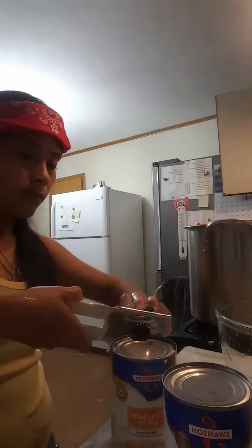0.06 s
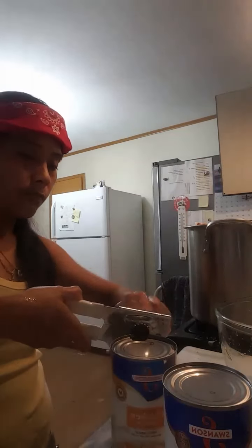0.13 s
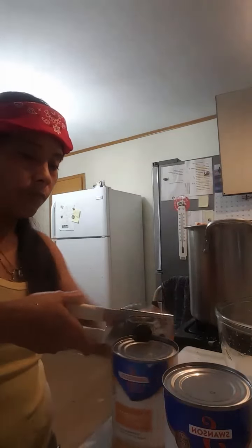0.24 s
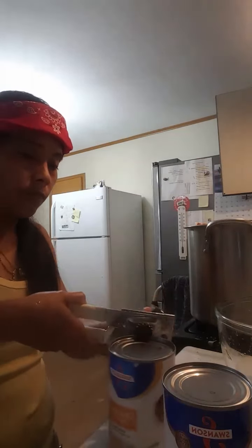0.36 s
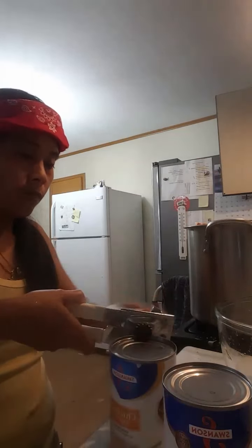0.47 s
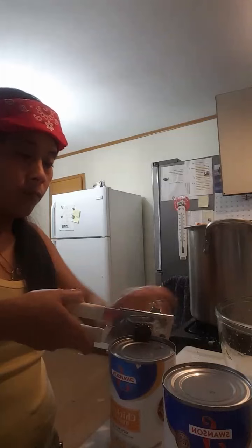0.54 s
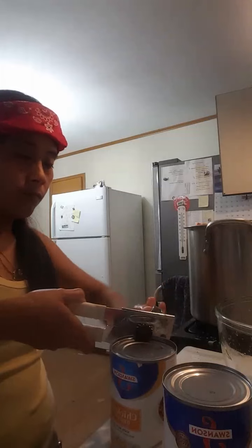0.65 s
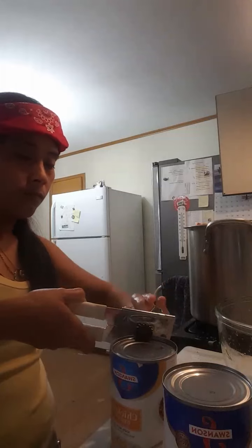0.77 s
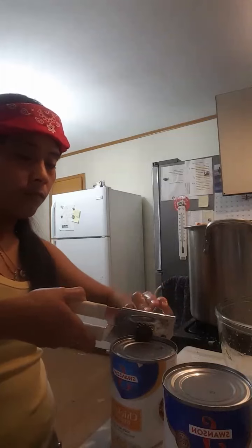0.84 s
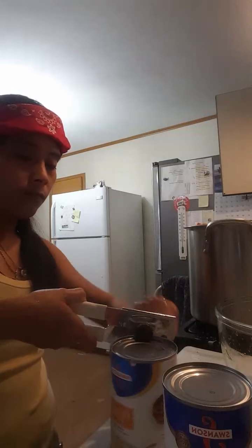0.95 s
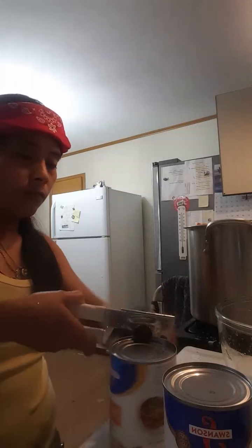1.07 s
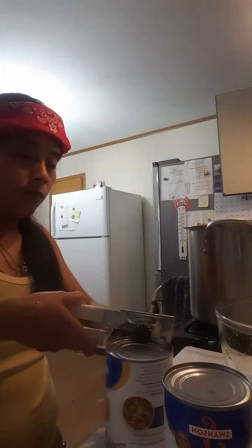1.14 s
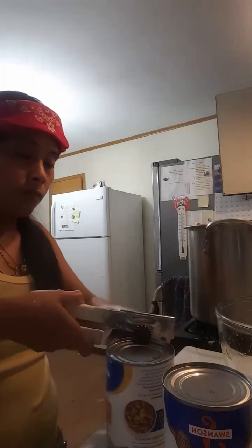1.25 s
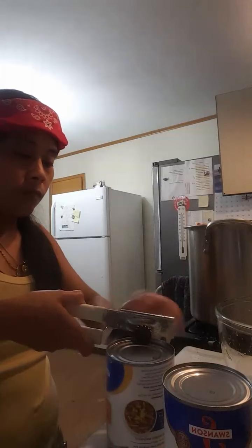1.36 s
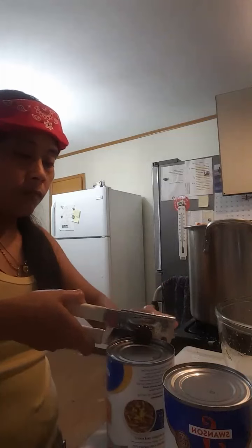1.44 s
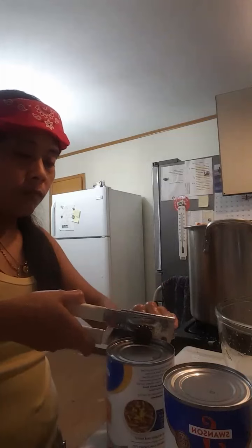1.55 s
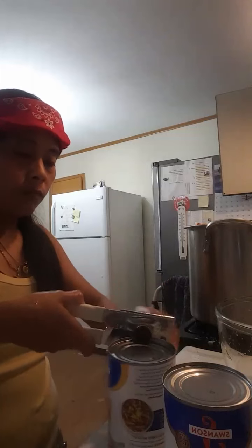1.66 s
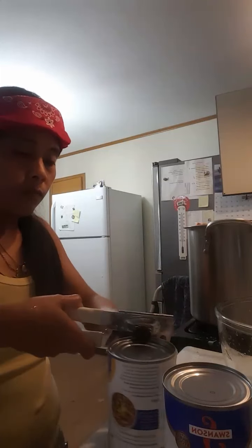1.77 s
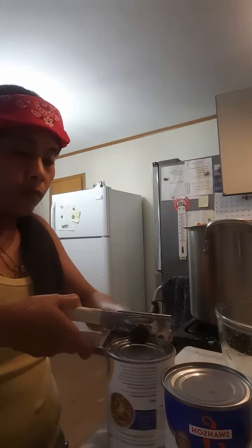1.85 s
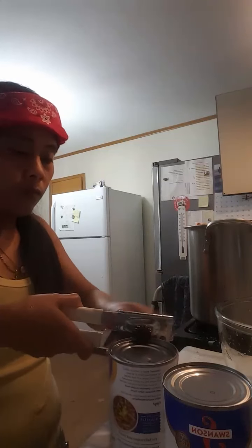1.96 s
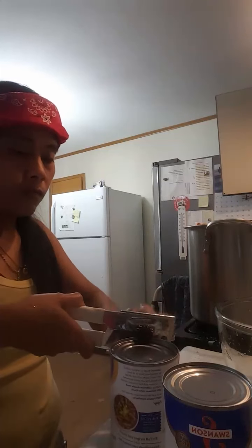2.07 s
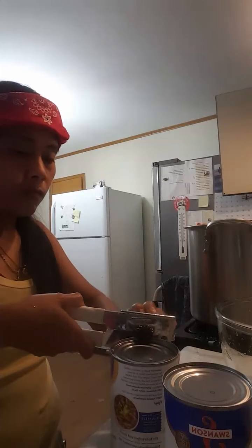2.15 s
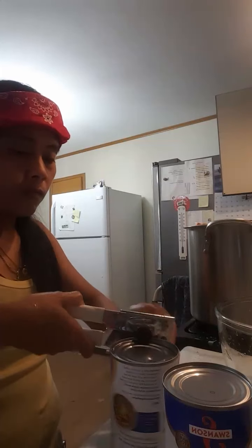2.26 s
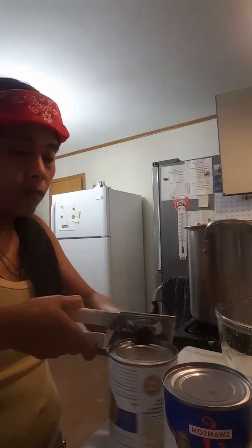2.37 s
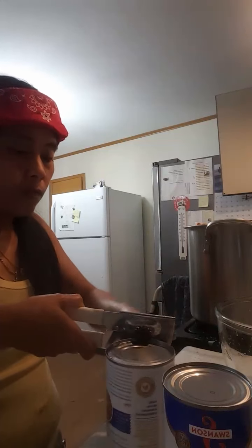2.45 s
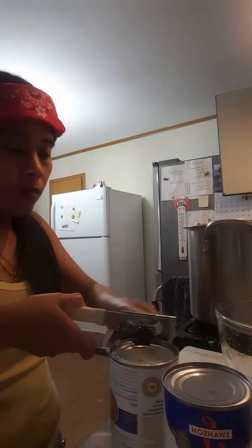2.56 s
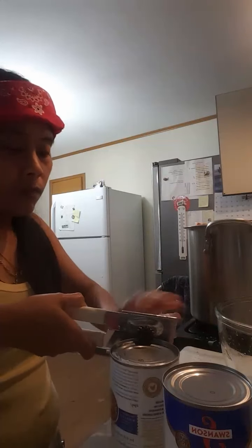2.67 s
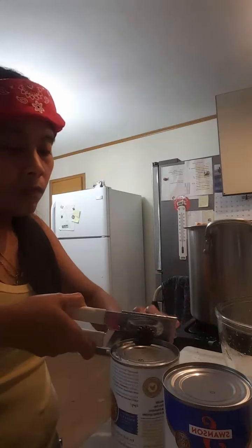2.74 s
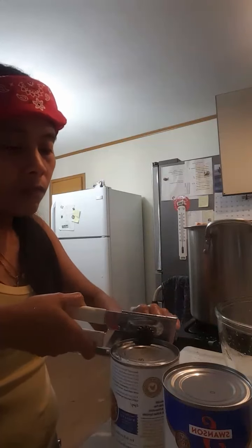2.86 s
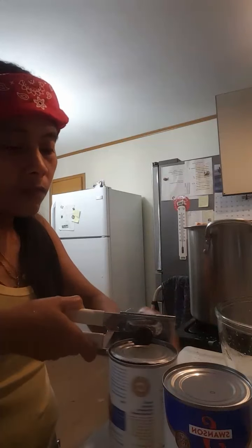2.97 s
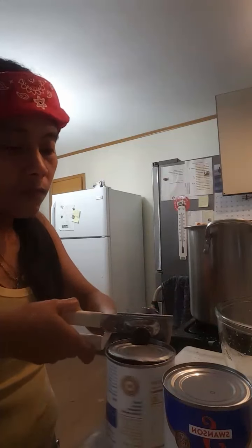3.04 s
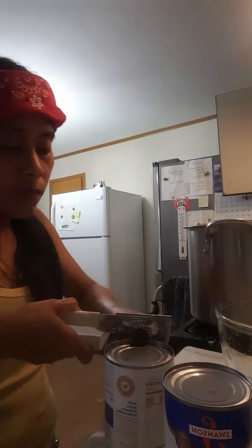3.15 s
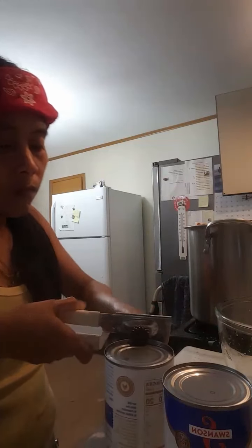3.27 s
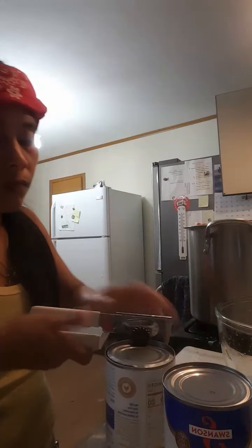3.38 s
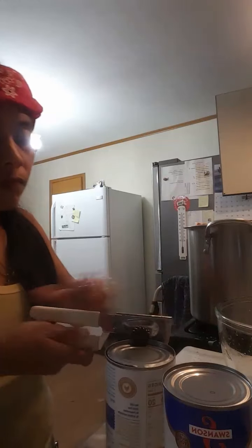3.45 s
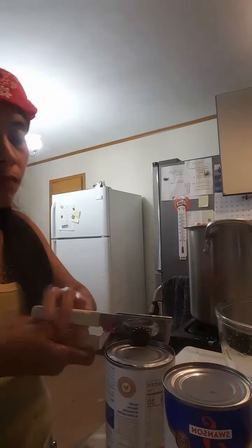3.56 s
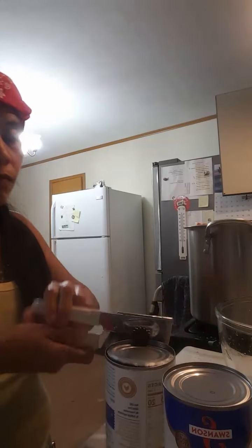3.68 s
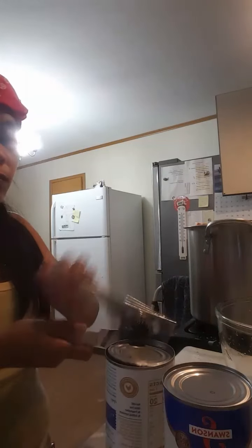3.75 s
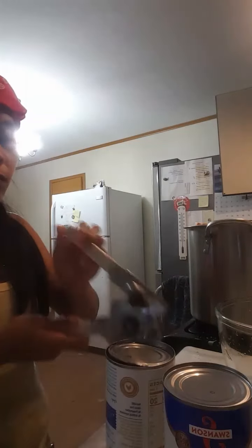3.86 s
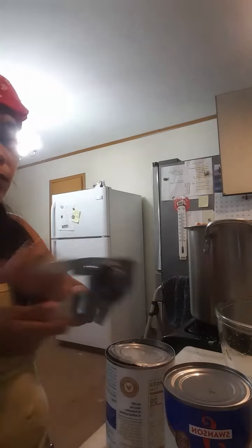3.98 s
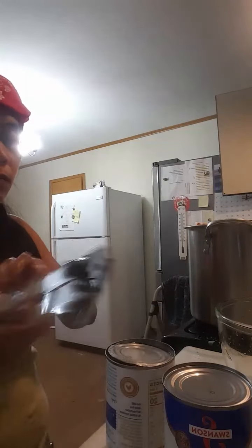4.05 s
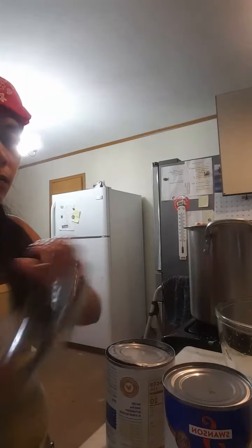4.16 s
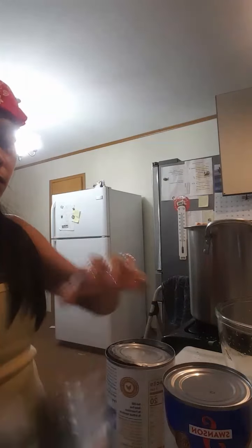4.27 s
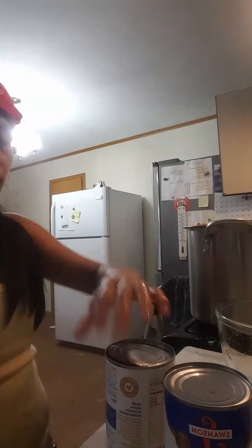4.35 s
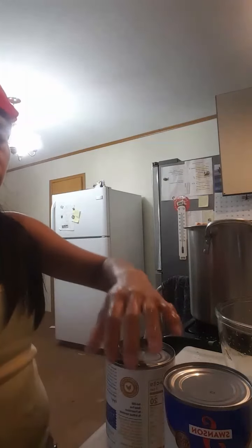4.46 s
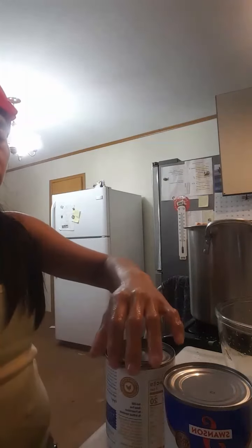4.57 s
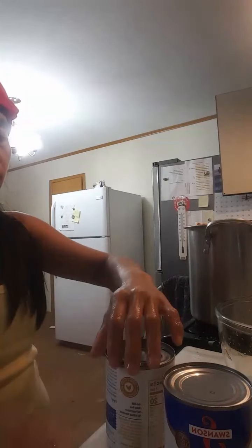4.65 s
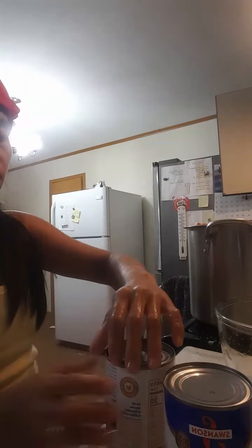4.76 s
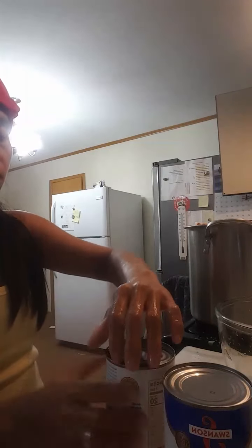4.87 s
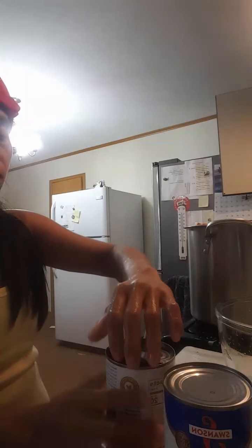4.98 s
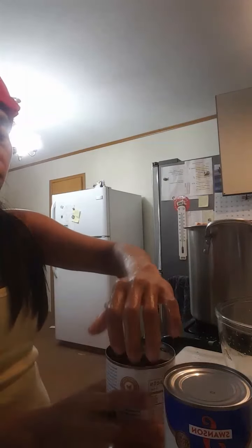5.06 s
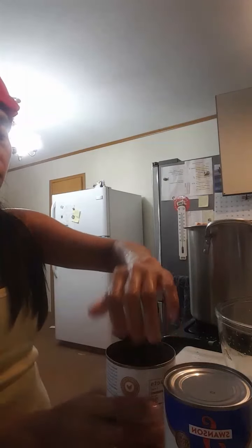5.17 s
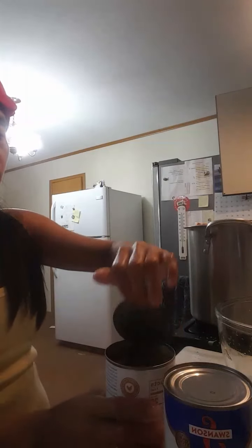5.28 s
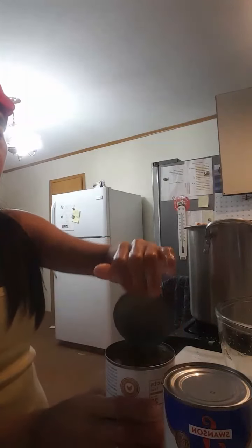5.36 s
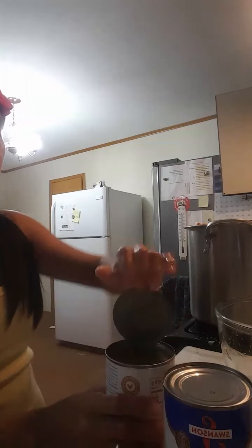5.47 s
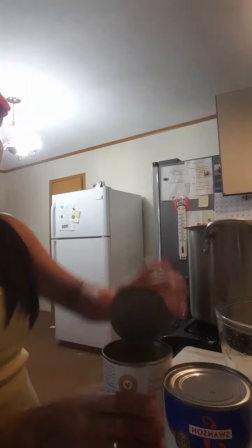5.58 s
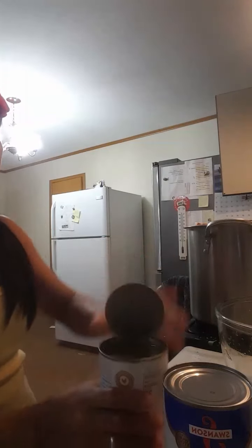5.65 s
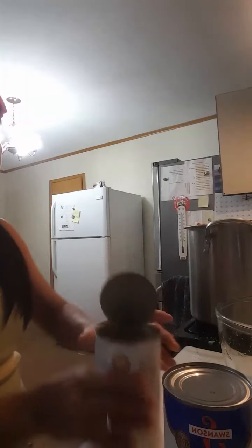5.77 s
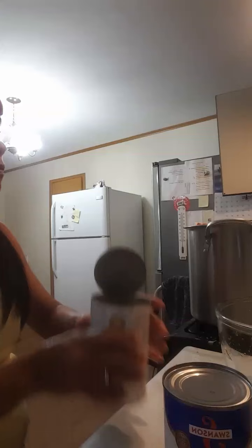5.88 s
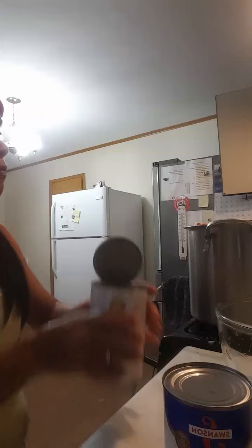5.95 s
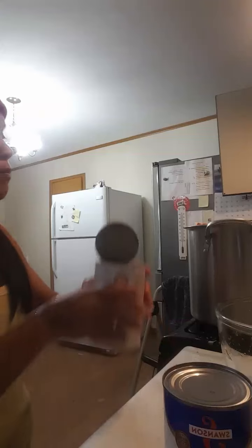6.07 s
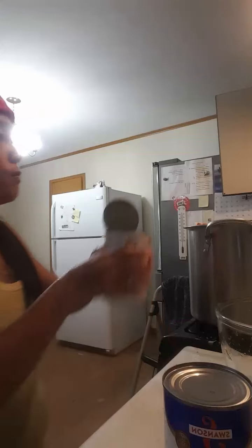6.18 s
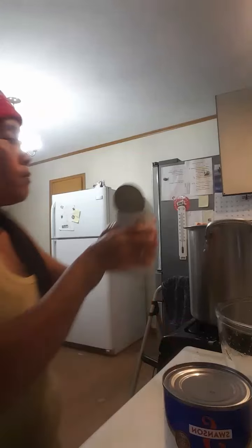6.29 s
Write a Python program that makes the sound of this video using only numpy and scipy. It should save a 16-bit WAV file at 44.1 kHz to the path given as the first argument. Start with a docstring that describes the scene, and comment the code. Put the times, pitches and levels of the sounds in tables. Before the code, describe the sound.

A hand-crank can opener grinds around a can in short strokes, then snaps shut, clatters onto a counter, and the lid is bent up.

```python
"""Opening a can by hand crank.

Gear teeth jolt a full can, the wheel grinds through tin, the kitchen counter thuds. The handles
snap shut, the opener drops on the counter and the lid is bent up. Blows and slips ring damped
modes, heard close by over a fridge hum in a small hard room."""
import sys
import numpy as np
from scipy import signal
from scipy.fft import rfft, irfft
from scipy.io import wavfile

SR = 44100
rng = np.random.default_rng(int(sys.argv[2]) if len(sys.argv) > 2 else 0)


def wav_record(signal):
    """Record a signal, one row per channel, as 16-bit PCM in the file named by sys.argv[1]."""
    frames = np.transpose(np.atleast_2d(signal))
    bounded = np.clip(frames, -1, 1)
    # unit amplitude maps onto the largest positive 16-bit level
    quanta = np.round(bounded * 32767).astype(np.int16)
    wavfile.write(sys.argv[1], SR, quanta)


N = 278712

# start_s, hardest_s, end_s, level_db
CRANK_STROKES = [(.13, .25, .43, -23.5), (.46, .496, .55, -36), (.9, 1.06, 1.25, -25),
                 (1.62, 1.735, 1.875, -22.5), (1.92, 1.96, 2.03, -39), (2.25, 2.35, 2.51, -23),
                 (2.52, 2.58, 2.68, -38), (2.905, 2.94, 3.24, -28), (3.68, 3.808, 3.92, -34)]  # with short creeps as the hand regrips
LID_SCRAPES = [(5.176, 5.2, 5.52, -34)]

# start_s, level_db
TOOTH_BITES = [(0.166, -21), (0.207, -18), (0.235, -20), (0.270, -19), (0.312, -19), (0.372, -21),
               (0.959, -22.5), (1.004, -18), (1.037, -21), (1.07, -16), (1.088, -20), (1.107, -17.5),
               (1.139, -19), (1.182, -24.5), (1.246, -29), (1.271, -27), (1.668, -21.5), (1.701, -18),
               (1.729, -14.5), (1.76, -15), (1.796, -19.5), (1.868, -29), (2.268, -30), (2.313, -15),
               (2.346, -14), (2.362, -16), (2.373, -14), (2.408, -19), (2.535, -29.5), (2.923, -24),
               (2.946, -22), (2.989, -19), (3.041, -24), (3.105, -25), (3.795, -15)]
CAN_KNOCKS = [(1.933, -15), (2.582, -16.5), (3.4, -13), (3.665, -30)]
COUNTER_THUDS = [(0.205, -22), (0.39, -25), (0.515, -30), (0.563, -25.5), (0.94, -25), (0.974, -18),
                 (1.02, -20), (1.24, -24), (1.699, -19), (1.747, -21), (1.92, -25), (2.278, -23),
                 (2.39, -20), (2.54, -26), (2.6, -27), (2.98, -19), (3.16, -25), (3.23, -27), (3.401, -20),
                 (3.655, -23), (4.565, -25), (4.64, -28), (5.185, -27), (5.462, -33)]  # from hand and can

# start_s, level_db, crack_relative_db
OPENER_IMPACTS = [(4.568, 0, -1), (4.578, -7, -12), (4.587, -14, -25), (4.612, -18, -17), (4.622, -.5, -20),
                  (4.626, -6.5, -6), (4.637, -12, -12.5), (4.652, -15, -17.5), (4.664, -15, -4),
                  (4.689, -22, -12), (4.714, -15, -3), (4.727, -22.5, -25)]
LID_BENDS = [(5.181, -36, 9), (5.196, -24, -11), (5.207, -23, -2), (5.228, -23, -7), (5.257, -27, 1.5),
             (5.297, -36, -10), (5.329, -30.5, -20), (5.345, -35, -14), (5.394, -31, -27),
             (5.434, -33, -17)]

# start_s, click_db, ring_hz, ring_db
LOOSE_PART_TICKS = [(0.703, -52, 5030, -65.5), (0.737, -45.5, 5890, -60), (0.8, -54, 5000, -68),
                    (1.285, -35, 6320, -59), (1.877, -50, 6000, -62), (2.02, -54, 5500, -66),
                    (2.04, -54, 5500, -66), (2.219, -54, 5000, -74), (2.672, -47, 4900, -58),
                    (2.711, -46, 5200, -59), (2.732, -42, 1750, -36), (3.228, -53, 5000, -66),
                    (3.287, -52, 5000, -66), (3.304, -54, 5000, -66), (3.441, -45, 5500, -53),
                    (3.43, -52, 4400, -57), (3.549, -56, 5550, -60), (3.655, -52, 5060, -59.5),
                    (3.721, -39, 1960, -37), (3.750, -38.5, 2058, -28), (3.808, -25.5, 3800, -37),
                    (4.107, -24, 3440, -32), (4.332, -33.5, 2420, -37), (5.026, -61.5, 3800, -67)]
# start_s, level_db, wash_db, wash_t60_s
HANDLE_SNAP = (4.1186, -2.5, -27.5, 0.43)

# pitch_hz, gain_db, t60_s
CAN_MODES = [(296, -4.5, 0.084), (425.3, -1.5, 0.054), (558.6, -1.5, 0.056), (652, 4, 0.025),
             (802, 3, 0.023), (1040, -19, 0.016), (1202, -2, 0.047), (1678, -10, 0.085), (2197, -12, 0.045),
             (2663, -14, 0.036), (3268, -15, 0.0291), (4200, -25.5, 0.023), (5330, -26, .03)]
KNOCK_MODES = [(275, -5.5, 0.11), (385, -4.5, 0.086), (548, 4.5, 0.085), (670, -7, 0.037), (870, 4, 0.048),
               (1150, -6, 0.034), (1890, -19, 0.027)]
COUNTER_MODES = [(62, -6.5, 0.085), (113.6, -1.5, 0.26), (139.3, -0.5, .12)]
OPENER_MODES = [(343, -13, 0.094), (478.3, -13, 0.08), (682.5, -1, 0.056), (839, -2.5, 0.041),
                (1144, -7, 0.039), (1455, -9, 0.03), (1820, -8, 0.028), (2067, -14, 0.071),
                (2623, -11.5, 0.064), (3595, -23, 0.066), (4710, -22.5, .04), (6480, -18.5, 0.015),
                (7820, -18, .07)]
HANDLE_MODES = [(2520, -26, 0.25), (3840, -21, 0.0045), (4500, -15, .003), (5600, 10.5, 0.0032),
                (7120, -3.5, 0.0035), (8580, 7, 0.0041), (11600, -10.5, .002)]
LID_MODES = [(763, 2.5, 0.058), (1026, 4, .04), (1610, -4, 0.037), (2366, 1.5, .04), (2820, -9.5, .03),
             (3738, -5.5, .03), (5840, -19.5, 0.036), (7670, -14, 0.028)]

# frequency_hz, relative_density_db
AIR_SPECTRUM = [(24, -20), (40, -14.5), (97, -6), (143, -0.5), (251, -4), (372, -7.5), (487, -5.5),
                (623, -16.5), (721, -15), (1430, -31), (1740, -24.5), (2850, -35.5), (14000, -56.5)]
# centre_hz, width_hz, level_db
APPLIANCE_TONES = [(55, 8, -56), (480, 30, -54.5)]
# start_s, fall_s, until_s, return_s, depth_db
BACKGROUND_DIP = (4.6, .18, 5.17, .05, -12)

AIR_DB = -43.5
ROOM_DB, ROOM_T60_S, ROOM_TREBLE_T60_S = -15, 0.31, 0.26
JOLT_DB, JOLT_DB_PER_BITE_DB, JOLT_SPREAD_DB = -16, .45, 1.5
BODY_EASE_DB, HISS_EASE_DB, EASE_POWER = -27, -25, 1.9
SLIP_UNEVENNESS_DB = 3.0


def undb(db):
    return 10 ** (np.asarray(db) / 20)


def unit_rms(x):
    return x / np.sqrt(np.mean(x ** 2))


def band(x, lo_hz, hi_hz):
    sos = signal.butter(2, [lo_hz, min(hi_hz, .45 * SR)], "bandpass", fs=SR, output="sos")
    return signal.sosfilt(sos, x)


def decay(t, t60_s):
    return np.exp(-np.log(1000) * t / t60_s)


def place(out, start_s, sound, peak_db):
    i = int(start_s * SR)
    part = sound[:N - i]
    out[i:i + len(part)] += part * undb(peak_db) / np.abs(sound).max()


def ring(modes, scatter, chatter_s, count=6, samples=5000):
    """Struck body: each mode is a cluster of neighbours, set off one by one by contact chatter."""
    hz, db, t60_s = np.repeat(np.transpose(modes), count, axis=1)[:, :, None]
    detune = 1 + scatter * rng.standard_normal(hz.shape)
    onset_s = chatter_s * rng.exponential(size=hz.shape)
    t = np.maximum(np.arange(samples) / SR - onset_s, 0)
    polarity = (-1.) ** np.arange(len(hz))[:, None]  # neighbours cancel far from the modes
    return (polarity * undb(db) * decay(t, t60_s) * np.sin(2 * np.pi * hz * detune * t)).sum(0)


def crack(rise_s, lo_hz, hi_hz):
    """Noise burst under a contact force that builds and lets go."""
    t = np.arange(2000) / SR
    force = t / rise_s * np.exp(-t / rise_s)
    return band(rng.standard_normal(len(t)) * force, lo_hz, hi_hz)


def blows(rows, modes, scatter, chatter_s, crack_s, crack_lo_hz=3000):
    """Each blow rings the body; a bright crack rides on it."""
    out = np.zeros(N)
    for start_s, db, crack_relative_db in rows:
        place(out, start_s, ring(modes, scatter, chatter_s), db)
        place(out, start_s, crack(crack_s, crack_lo_hz, 13000), db + crack_relative_db)
    return out


def stroke_db(strokes, ease_db):
    """Strokes peak at their hardest point and sink by ease_db at both ends."""
    t = np.arange(N) / SR
    level_db = np.full(N, -90.)
    for start_s, hardest_s, end_s, db in strokes:
        away = np.abs(t - hardest_s) / np.where(t < hardest_s, hardest_s - start_s, end_s - hardest_s)
        level_db = np.maximum(level_db, db + ease_db * away ** EASE_POWER)
    return level_db


def grinding(strokes, modes, body_db, hiss_db):
    """Dense uneven slips of edge on tin ring the body; torn metal hisses in grains."""
    slips = rng.standard_normal((2, N))
    grain_db = SLIP_UNEVENNESS_DB * rng.exponential(size=(2, N // 44 + 1))  # 1 ms grains
    body_slips, hiss_slips = slips * undb(grain_db.repeat(44, axis=1)[:, :N])
    response = ring(modes, scatter=.1, chatter_s=.004, count=40)
    body = unit_rms(signal.fftconvolve(body_slips, response)[:N])
    hiss = unit_rms(band(hiss_slips, 1000, 9900) + 0.65 * band(hiss_slips, 10000, 19000))
    body *= undb(body_db + stroke_db(strokes, BODY_EASE_DB))
    hiss *= undb(hiss_db + stroke_db(strokes, HISS_EASE_DB))
    return body + hiss


def kitchen_hum():
    """Fridge and appliances: coloured noise and wavering tones. The whole background dips by 12 dB from 4.6 s
    until about 5.2 s."""
    hz, db = np.transpose(AIR_SPECTRUM)
    bins_hz = np.fft.rfftfreq(N, 1 / SR) + 1
    colour = undb(np.interp(np.log(bins_hz), np.log(hz), db))
    air = unit_rms(irfft(rfft(rng.standard_normal(N)) * colour, N)) * undb(AIR_DB)
    tones = np.zeros(N)
    for centre_hz, width_hz, level_db in APPLIANCE_TONES:
        tone = band(rng.standard_normal(N), centre_hz - width_hz / 2, centre_hz + width_hz / 2)
        tones += undb(level_db) * unit_rms(tone)
    start_s, fall_s, until_s, return_s, depth_db = BACKGROUND_DIP
    corners_s = [start_s, start_s + fall_s, until_s, until_s + return_s]
    dip_db = np.interp(np.arange(N) / SR, corners_s, [0, depth_db, depth_db, 0])
    return (air + tones) * undb(dip_db)


def room(x):
    """Hard walls: a noise tail that builds up, then loses treble first."""
    t = np.arange(SR // 2) / SR
    noise = rng.standard_normal(len(t))
    tail = band(noise, 200, 2800) * decay(t, ROOM_T60_S)
    tail += band(noise, 3500, 16000) * decay(t, ROOM_TREBLE_T60_S)
    tail *= 1 - np.exp(-t / 0.016)
    return signal.fftconvolve(x, tail / np.sqrt(np.sum(tail ** 2)))[:N] * undb(ROOM_DB)


def counter_thuds():
    """Soft pushes from hand, can and teeth swing the counter top; harder bites jolt harder."""
    out = np.zeros(N)
    push = np.hanning(int(0.0027 * SR))
    jolts = [(start_s, JOLT_DB + JOLT_DB_PER_BITE_DB * db + JOLT_SPREAD_DB * rng.standard_normal())
             for start_s, db in TOOTH_BITES]
    for start_s, db in COUNTER_THUDS + jolts:
        swing = ring(COUNTER_MODES, scatter=0.034, chatter_s=.003, count=1, samples=9000)
        place(out, start_s, np.convolve(swing, push), db)
    return out


def can_knocks(crack_relative_db=-45):
    """The can knocks on the counter: soft contact, no treble."""
    rows = [(start_s, db, crack_relative_db) for start_s, db in CAN_KNOCKS]
    return band(blows(rows, KNOCK_MODES, scatter=0.037, chatter_s=.001, crack_s=0.0018), 120, 2500)


def loose_parts():
    """Small metal parts of the opener tick: short ring, broad click."""
    out = np.zeros(N)
    for start_s, click_db, ring_hz, ring_db in LOOSE_PART_TICKS:
        place(out, start_s, ring([(ring_hz, 0, .05)], scatter=.05, chatter_s=0.0033), ring_db)
        place(out, start_s, crack(rise_s=0.0017, lo_hz=1800, hi_hz=16000), click_db)
    return out


def lid_bend():
    """The lid cracks as it bends up; its edge scrapes the rim."""
    scrape = grinding(LID_SCRAPES, LID_MODES, body_db=-2, hiss_db=-20)
    return scrape + blows(LID_BENDS, LID_MODES, scatter=0.052, chatter_s=.005, crack_s=0.0024)


def opener_drop():
    """The opener lands, bounces and rocks."""
    return blows(OPENER_IMPACTS, OPENER_MODES, scatter=.045, chatter_s=.002, crack_s=.0018,
                 crack_lo_hz=2200)


def handle_snap():
    """Short bright clack; tiles and pans return an even wash."""
    out = np.zeros(N)
    t = np.arange(SR // 2) / SR
    start_s, db, wash_db, wash_t60_s = HANDLE_SNAP
    place(out, start_s, ring(HANDLE_MODES, scatter=.08, chatter_s=0.00036, count=30), db)
    envelope = decay(t, wash_t60_s) * (1 - np.exp(-t / 0.0063))
    place(out, start_s, band(rng.standard_normal(len(t)), 3000, 10000) * envelope, wash_db)
    return out


def gear_teeth(crack_relative_db=-26, crack_spread_db=3):
    """Teeth bite the rim and ring the can."""
    rows = [(start_s, db, rng.normal(crack_relative_db, crack_spread_db)) for start_s, db in TOOTH_BITES]
    return blows(rows, CAN_MODES, scatter=0.065, chatter_s=.002, crack_s=0.0016, crack_lo_hz=1500)


def cutting_wheel():
    """The wheel grinds through tin on each crank stroke."""
    return grinding(CRANK_STROKES, CAN_MODES, body_db=-5, hiss_db=-22)


def scene():
    near = can_knocks() + loose_parts() + lid_bend() + opener_drop() + gear_teeth() + cutting_wheel()
    return (kitchen_hum() + room(near) + counter_thuds() + handle_snap() + near)[None]


def record(dry, ceiling=.68, low_cut_hz=52, high_cut_hz=13900):
    """Phone microphone: rounds peaks, cuts deep bass and top."""
    x = ceiling * np.tanh(dry / ceiling)
    x = signal.sosfilt(signal.butter(6, low_cut_hz, "highpass", fs=SR, output="sos"), x)
    return signal.sosfilt(signal.ellip(8, .2, 60, high_cut_hz, fs=SR, output="sos"), x)


dry = scene()
out = record(dry)
wav_record(out)
```